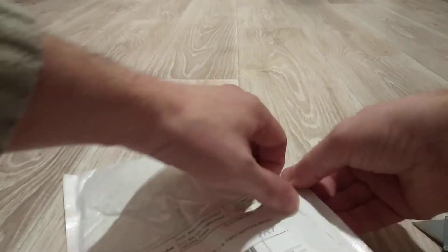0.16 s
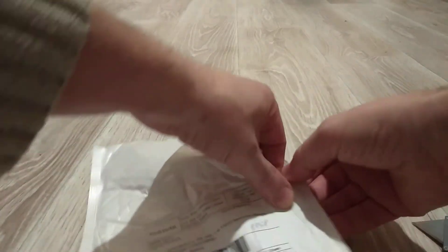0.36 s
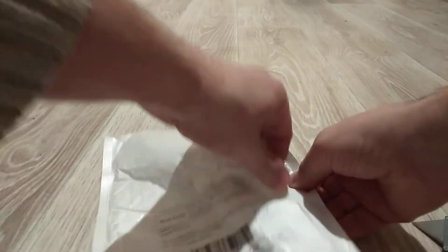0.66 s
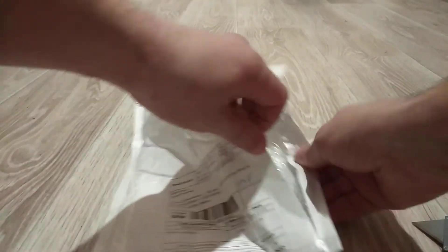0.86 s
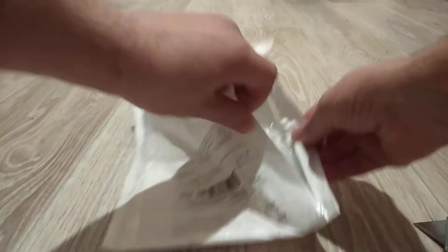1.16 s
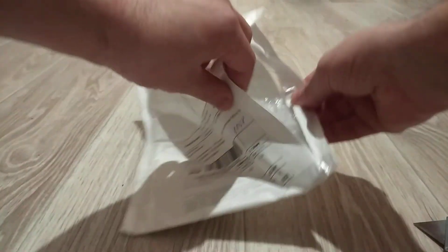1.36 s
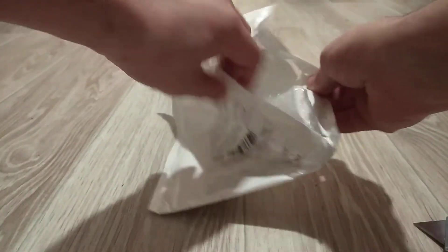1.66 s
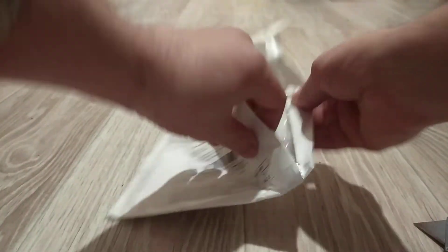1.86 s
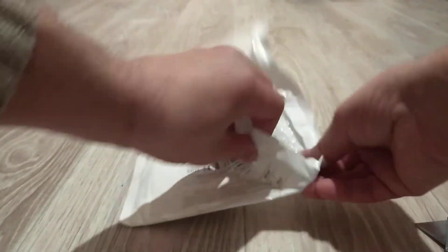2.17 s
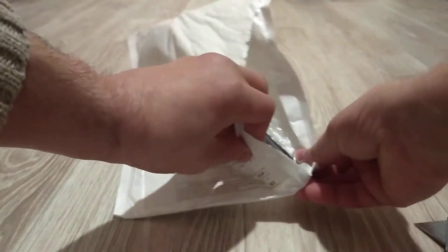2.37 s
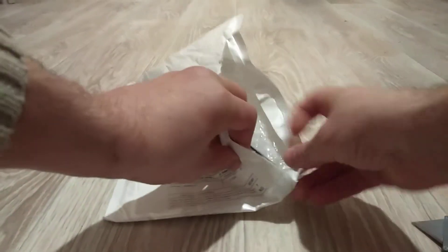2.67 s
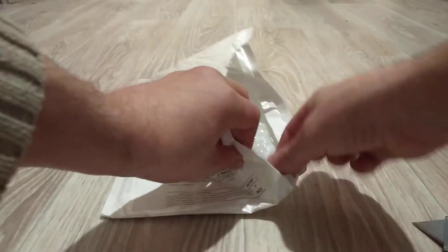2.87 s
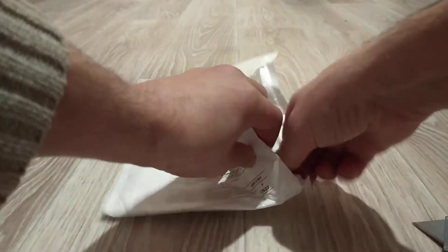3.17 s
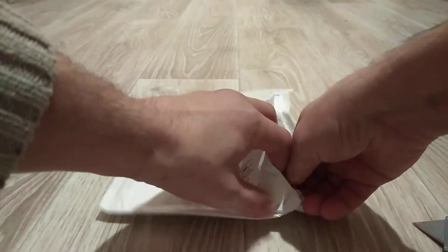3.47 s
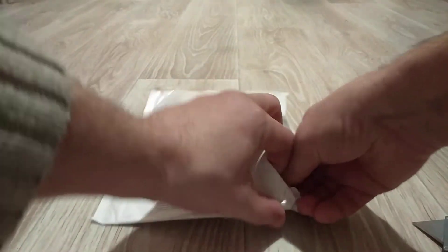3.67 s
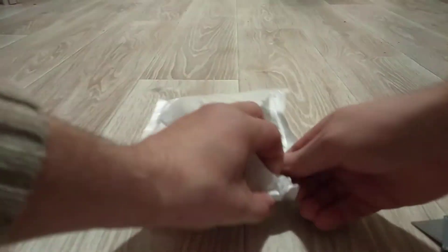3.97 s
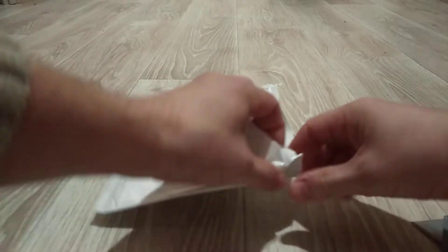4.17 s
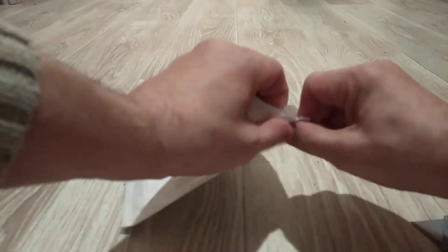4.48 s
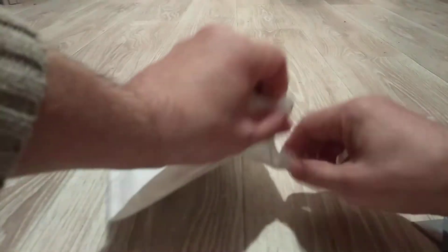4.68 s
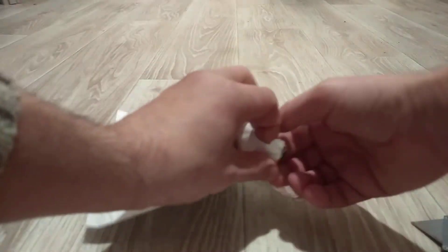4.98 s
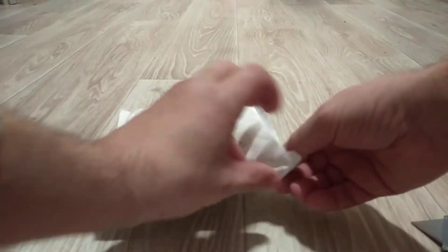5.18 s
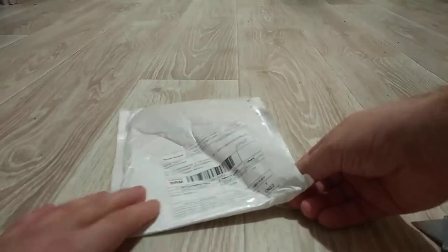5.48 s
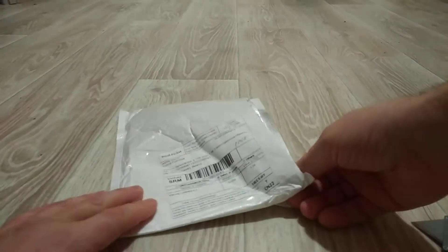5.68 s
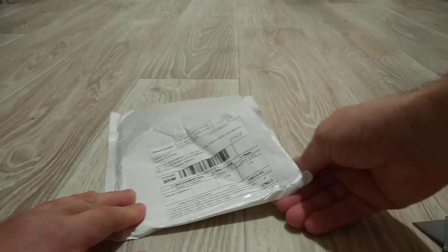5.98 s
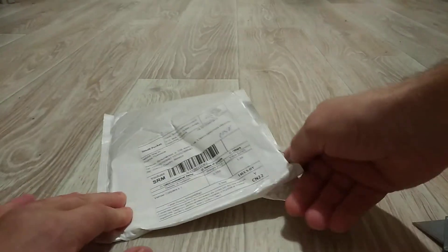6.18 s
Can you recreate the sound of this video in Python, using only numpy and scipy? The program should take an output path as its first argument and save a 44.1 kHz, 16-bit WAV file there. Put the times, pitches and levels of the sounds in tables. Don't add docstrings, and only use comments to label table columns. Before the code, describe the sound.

Thin, stiff plastic film crinkles and pops under fingers, heard very close in stereo. Strong rustling surges open the sound, thinning to sparse crackles, then one piercing tick and a busy flurry of tearing snaps before it settles into gentle handling. Dull muffled bumps of bag and fingers against floorboards sit underneath. The small room is quiet with hardly any echo.

```python
import sys
import numpy as np
from scipy import signal
from scipy.fft import rfft, irfft
from scipy.io import wavfile

SR = 44100
rng = np.random.default_rng(int(sys.argv[2]) if len(sys.argv) > 2 else 0)


def unload_wav(signal):
    wavfile.write(
        sys.argv[1],
        SR,
        np.round(np.clip(np.atleast_2d(signal).T, -1, 1) * 32767).astype(np.int16),
    )


def elevation(decibels):
    levels = np.asarray(decibels, float)
    return 10 ** (levels / 20)


N = 278712


# freq_hz, likeness_0to1
LIKENESS = [(60, 1), (130, 0.32), (290, 0.78), (640, 0.91), (1410, 0.97), (3100, 0.041), (6820, 0.16),
            (15000, 0.01)]
RUSTLE_TRIM_DB = [13, 7.5, -1.5, -2]
SNAP_TRIM_DB = [2.4, 26.1, 12.14, 12.37]


def film():
    narrow, lag_samples = 2.67, 2.0
    hiss_db, patchy_db = -12.0, 1.5
    tail_db, tail_s = -18.5, 0.0009
    swarm_db, swarm_s = -50, 0.0024
    colour_db, dull_db_per_oct = 2.5, 6.5

    rustle_levels = [level + trim for level, trim in zip(handling(), RUSTLE_TRIM_DB)]
    at, size, pitch_hz, lag, pan = creases()
    snap_s, fold, crease, fine = snaps()
    snap_levels = [level + trim for level, trim in zip([fold, fold, crease, fine], SNAP_TRIM_DB)]
    snap_at = (snap_s * SR).astype(int)
    snap_luck = rng.standard_normal((len(snap_s), 31))
    hand = drift(30)
    snap_lag = 0.5 * lag_samples * hand[snap_at]
    snap_pan_db = 1.5 * snap_luck[:, -1]

    white = rng.standard_normal((2, 2, N))
    fade = np.exp(-1 / (tail_s * SR))
    linger = np.exp(-1 / (swarm_s * SR))
    together = drift(9)
    edges_hz = 45 * 2 ** np.arange(0, 9.1, 0.5)
    out = 0
    for k, (low, high) in enumerate(zip(edges_hz, edges_hz[1:])):
        hz = np.sqrt(low * high)
        alike = np.clip(at_hz(LIKENESS, hz), 0, 1)
        mid, side = white[k % 2]
        noise = np.sqrt(alike) * mid + np.sqrt(1 - alike) * np.array([side, side[::-1]])

        snap = elevation(zone_mix(snap_levels, hz) + colour_db * snap_luck[:, k + 1])
        snap = snap * elevation(-dull_db_per_oct * max(np.log2(hz / 9000), 0))
        swarm = signal.filtfilt([1], [1, -linger], np.bincount(snap_at, snap, N)) * (1 - linger ** 2)

        level = elevation(zone_mix(rustle_levels, hz))
        reach = size * (0.15 + np.exp(-narrow * np.log(pitch_hz / hz) ** 2))
        struck = (level + elevation(swarm_db) * swarm) * clicks(at, reach, lag_samples * lag, 8.05 * pan)
        struck = struck + clicks(snap_at, snap, snap_lag, snap_pan_db)
        tail = elevation(tail_db) * signal.lfilter([0, 1], [1, -fade], struck)
        slide = level * elevation(hiss_db + patchy_db * (together + drift(46)))

        band = signal.butter(1, [low, min(high, 0.45 * SR)], "band", fs=SR, output="sos")
        out = out + (-1) ** k * signal.sosfilt(band, struck + (tail + slide) * noise)
    return out


def creases():
    per_s, clump_db, size_db = 1500, 3.0, 4.0
    luck, draw = rng.random(N), rng.exponential(1, N)
    at = np.flatnonzero(luck < per_s * elevation(clump_db * drift(25)) / SR)
    size = elevation(size_db * np.minimum(draw[at], 4))
    size /= np.sqrt(np.mean(size ** 2) * len(at) / N)
    pitch, lag, pan = rng.standard_normal((3, len(at)))
    return at, size, 3000 * np.exp(1.2 * pitch), lag, pan


def clicks(at, sizes, lag, pan_db):
    bounce_s, bounce_db = 0.0012, -11
    bounce = at + bounce_s * SR * (1.5 + np.tanh(pan_db) / 3)
    at = np.append(at, bounce)
    sizes = np.append(sizes, sizes * elevation(bounce_db))
    lag, pan_db = np.tile(lag, 2), np.tile(pan_db, 2)
    left_at = np.clip(at, 0, N - 1).astype(int)
    right_at = np.clip(at + np.round(lag), 0, N - 1).astype(int)
    left = np.bincount(left_at, sizes * elevation(pan_db / 2), N)
    right = np.bincount(right_at, sizes * elevation(-pan_db / 2), N)
    return np.array([left, right])


# time_s, rustle_db
GRIP = [(0, -75), (.5, -75), (1.05, -49), (1.3, -49), (1.5, -65.5), (2.0, -53.5), (2.47, -70),
        (2.55, -53.5), (2.9, -72), (3.3, -54), (3.65, -53), (4.42, -54), (4.92, -56.5), (5.15, -52.5),
        (5.37, -75), (5.6, -54), (5.7, -56.5), (6.32, -52)]
# peak_s, rustle_db, decay_s, heaviness_db
TUGS = [(0.052, -43, 0.055, -5.5), (.27, -42.5, 0.6, 1), (0.588, -41, 0.064, -1),
        (0.722, -40.5, 0.085, -10), (0.871, -35.5, 0.11, -1.5), (1.34, -73, 0.049, -7),
        (1.551, -39.5, 0.18, -3), (1.818, -42.5, 0.2, -6), (1.981, -41, 0.11, -2), (2.181, -45, 0.24, -7),
        (2.32, -37.5, 0.12, -0.5), (2.72, -52, 0.24, -3), (2.96, -47, 0.27, 1),
        (3.055, -48.5, 0.015, -22.5), (3.158, -46.5, 0.067, -6), (3.36, -46.5, 0.44, 5),
        (3.728, -40, 0.054, 9), (3.91, -48.5, 0.15, 9), (4.03, -47.5, 0.039, 5), (4.178, -41.5, 0.033, -12),
        (4.29, -53.5, 0.099, 8), (4.499, -56, 0.11, -3), (4.625, -43, 0.13, -6), (4.69, -42, 0.077, 19),
        (4.74, -45, 0.19, 3.5), (5.05, -44.5, 0.046, -2), (5.228, -37.5, 0.068, 3), (5.51, -46, 0.23, -1.5),
        (5.952, -50, 0.36, 3), (6.168, -43.5, 0.25, 2.5)]
GRIP_ZONE_DB = [-6.5, -11, -1, 0]
TUG_ZONE_DB = [-31.5, -11, -1.4, -0.07]
HEAVY_SHARE = [1.1, 0.45, -0.11, -0.61]
GRIP_SHARE = [.2, .8, 1.01, 1.2]


def handling():
    drag_db, drag_s = -17.5, 0.072
    t = np.arange(0, N + 100, 100) / SR
    peak_s, tug_db, decay_s, heavy_db = np.transpose(TUGS)
    grip_db = np.interp(t, *np.transpose(GRIP))
    mean_db = grip_db.mean()
    power = []
    for follow, rest_db, zone_db, share in zip(GRIP_SHARE, GRIP_ZONE_DB, TUG_ZONE_DB, HEAVY_SHARE):
        held = elevation(2 * (mean_db + follow * (grip_db - mean_db) + rest_db))
        tugged = swell(t, peak_s, tug_db + zone_db + share * heavy_db, decay_s).sum(axis=0)
        power.append(held + tugged)
    pat_s, pat_db, _ = np.transpose(PATS)
    power[0] = power[0] + swell(t, pat_s, pat_db + drag_db, np.full(len(pat_s), drag_s)).sum(axis=0)
    return [np.interp(np.arange(N) / SR, t, 10 * np.log10(p)) for p in power]


def swell(t, peak_s, peak_db, decay_s):
    drop_db, rise_share = 16.5, 0.78
    late = (t - peak_s[:, None]) / decay_s[:, None]
    return elevation(2 * (peak_db[:, None] - drop_db * np.maximum(late, -late / rise_share)))


# start_s, level_db, loss_db (per finer zone)
FOLDS = [(0.2827, -31, 3), (.6109, -34.5, 0.5), (.636, -29.5, 11), (0.797, -39.5, -4), (0.8393, -18, 7),
         (.862, -25, 4), (0.8758, -32, 3), (4.3758, -48, 15), (1.5186, -27, 12), (5.4011, -43, 3),
         (2.2967, -27.5, -1), (2.5572, -38, 19), (2.708, -39.5, 9), (2.7241, -53, -7), (3.3341, -30.5, -5),
         (3.415, -38, -2.5), (3.5107, -43, -4.5), (3.7285, -48, -3), (4.0202, -46, -9), (4.1733, -40.5, 13),
         (4.613, -40, 6), (4.6854, -33.5, 13), (4.699, -33, 8), (4.74, -35, 19), (4.7796, -46.5, -6.5),
         (5.2326, -36.5, -1), (5.503, -39, 5), (5.597, -35.5, 6), (5.9497, -46, 7), (6.1804, -30, 29)]
# start_s, level_db, loss_db (per neighbouring zone)
CREASES = [(.0018, -22, 10), (0.0271, -28, 8), (0.213, -37, -3), (0.2783, -27, -0.5), (0.4071, -28.5, 2.5),
           (.6109, -49, 13), (0.8378, -18, 25), (.862, -26, 11), (0.9536, -26, 13), (1.156, -34, 14),
           (1.5814, -26.5, -1.5), (1.6313, -16, 4), (1.9608, -31, 14), (1.9684, -27, 4),
           (2.3377, -20.5, 30), (2.9336, -31, -2), (2.982, -32, -8.5), (3.1317, -26.5, 15),
           (3.3716, -31, 11), (3.4254, -36, 11), (3.5586, -32, 6.5), (3.784, -27.5, 6.5),
           (4.0066, -30.5, 4), (4.2806, -30.5, 2), (4.4751, -23.5, 9), (4.5072, -12, 11.5),
           (5.4007, -28.5, -8), (5.838, -32, -7.5), (5.879, -23.5, 16), (5.964, -34.5, 21)]
# start_s, level_db, loss_db (per broader zone)
TICKS = [(.6993, -25.5, 9.5), (0.9011, -18, 8), (0.9124, -25.5, 4.5), (1.3306, -15, 14.5), (1.424, -27, 17),
         (1.5202, -20, 21), (1.548, -27, 35), (1.562, -22, 10), (1.5893, -22.5, 14), (2.1994, -18.5, 18),
         (2.312, -21, 22), (2.947, -23.5, 15), (2.9581, -35, 19), (3.3333, -8, 26), (3.4335, -26.5, 6),
         (3.4567, -26, 8), (3.9068, -15, 12.5), (3.9288, -37, 21), (4.0323, -27.5, 4.5), (4.181, -18, 20),
         (4.4493, -17.5, 17.5), (4.5587, -17, 9), (4.6053, -18.5, 10), (4.676, -13.5, 7.5),
         (4.8464, -29.5, 5.5), (5.045, -17.5, 11.5), (4.4746, -23.5, 27), (6.0827, -18.5, 9),
         (6.1799, -19.5, 17), (6.2604, -23, 8.5)]
# start_s, fine_film_db, loss_db (into the creases)
CRACKLES = [(.5612, -40, 2), (.5698, -32, 8), (1.1623, -38, 0), (2.1404, -58, 10), (2.8729, -40, 12),
            (3.0008, -30, 15), (3.0405, -27, 13), (3.0559, -31, 17), (3.3265, -24, 15), (3.679, -30, 11),
            (3.7073, -33, 5), (3.8462, -37, -1.5), (4.0574, -32, -2), (4.1762, -20, 19), (4.435, -35, -4),
            (4.382, -30, 25), (4.4083, -34.5, 7), (4.4175, -35, 4), (4.5153, -26, 19), (4.5649, -17, 10),
            (4.8057, -24, 21), (5.7206, -33.5, 12.5), (4.97, -39, -4), (5.0544, -41, 22), (5.2478, -34, 4),
            (5.2756, -29, 7), (5.65, -55, 14), (5.943, -44, -7), (6.1182, -31, 5), (6.1218, -30, 5)]


def snaps():
    crease_thin_db, crackle_thin_db = 15, 24
    rows = [(s, db, db - loss, db - 2 * loss) for s, db, loss in FOLDS]
    rows += [(s, db - loss - crease_thin_db, db, db - loss) for s, db, loss in CREASES]
    rows += [(s, db - 2 * loss, db - loss, db) for s, db, loss in TICKS]
    rows += [(s, db - loss - crackle_thin_db, db - loss, db) for s, db, loss in CRACKLES]
    return np.transpose(rows)


ZONE_HZ = [200, 1000, 3200, 9000]


def zone_mix(levels, hz):
    shares = [at_hz(list(zip(ZONE_HZ, one)), hz) for one in np.eye(4)]
    return sum(share * level for share, level in zip(shares, levels))


# start_s, peak_db, pitch_hz
TAUT = [
    (.408, -30, 2000),
    (2.983, -29.5, 4160),
    (3.3335, -20, 8600),
    (3.906, -24.5, 4540),
    (4.607, -28.5, 3800),
    (5.838, -31, 3700),
]


def taut_patches():
    return rings(TAUT, cycles=3.2, boost_db=5.5, cut_hz=370)


# start_s, peak_db, pitch_hz
PATS = [(0.28, -58, 413), (0.576, -45, 284), (0.635, -42, 121.6), (0.838, -45, 338), (0.862, -26, 500),
        (0.875, -36, 264), (0.72, -50, 170), (1.52, -43.5, 163), (1.583, -43.5, 297), (1.63, -38.5, 228),
        (1.976, -47.5, 293), (2.295, -62, 544), (2.394, -53.5, 176), (2.495, -36.5, 316), (2.595, -45, 360),
        (2.706, -43.5, 540), (2.962, -60, 534), (3.186, -44.5, 563), (3.341, -41, 272), (3.365, -38, 490),
        (3.456, -40, 564), (3.783, -43, 530), (4.736, -37, 227), (4.806, -35.5, 241), (5.046, -46.5, 326),
        (5.231, -49, 228), (5.502, -39, 370.0), (5.559, -34.5, 306), (5.861, -40.5, 254), (6.147, -42, 523)]


def pats():
    return rings(PATS, cycles=0.87, boost_db=-1.0, cut_hz=142)


def rings(events, cycles, boost_db, cut_hz):
    out, t = np.zeros(N + SR), np.arange(SR // 12) / SR
    for start_s, peak_db, hz in events:
        at = int(start_s * SR)
        ring = np.sin(2 * np.pi * hz * t) * np.exp(-t * hz / cycles)
        out[at:at + len(t)] += elevation(peak_db + boost_db) * ring
    return signal.sosfilt(signal.butter(4, cut_hz, "high", fs=SR, output="sos"), out[:N])


def room(x):
    t60_s, wet_db, apart_hz = 0.25, -39.0, 870
    t = np.arange(SR // 2) / SR
    mid, side = rng.standard_normal((2, len(t)))
    side = signal.sosfilt(signal.butter(2, apart_hz, "high", fs=SR, output="sos"), side)
    answer = elevation(wet_db - 60 * t / t60_s) * (mid + side * [[1], [-1]]) * (t > 0.004)
    answer[:, 0] = 1
    return signal.fftconvolve(x, answer, axes=1)[:, :N]


def drift(rate_hz):
    r = np.exp(-80 * np.pi * rate_hz / SR)
    slow = signal.lfilter([1], [1, -2 * r, r * r], rng.standard_normal(N // 40 + 2002))[2000:]
    return np.interp(np.arange(N) / 40, np.arange(len(slow)), slow / slow.std())


def at_hz(points, hz):
    freq_hz, value = np.transpose(points)
    return np.interp(np.log(hz), np.log(freq_hz), value)


def fft_hz():
    return np.maximum(np.arange(N // 2 + 1) * SR / N, 10)


def causal(x, db):
    cepstrum = irfft(np.log(elevation(db)))
    cepstrum[..., 1:N // 2] *= 2
    cepstrum[..., N // 2 + 1:] = 0
    return irfft(rfft(x) * np.exp(rfft(cepstrum)), N)


# freq_hz, gain_db
COLOUR = [(35, -36), (60, -4.5), (120, 4), (600, 4.5), (1300, 1.5), (4700, 6), (4850, -4), (5700, 1),
          (7200, 8), (9100, 7), (11000, -1.5), (14200, -2.5), (14800, -29), (16500, -31)]


def scene():
    rustle = causal(film(), at_hz(COLOUR, fft_hz()))
    return room(rustle + taut_patches() + pats())


def top_cut(x):
    return signal.sosfilt(signal.butter(12, 16490, fs=SR, output="sos"), x)


# freq_hz, left_minus_right_db
PORTS = [(60, 4), (150, 15), (300, 9.5), (600, -1), (4400, 0), (8000, 0), (14000, 8.5)]


def record(dry):
    mix = causal(dry, at_hz(PORTS, fft_hz()) * [[0.3], [-0.7]])
    return top_cut(mix)


dry = scene()
out = record(dry)
unload_wav(out)
```